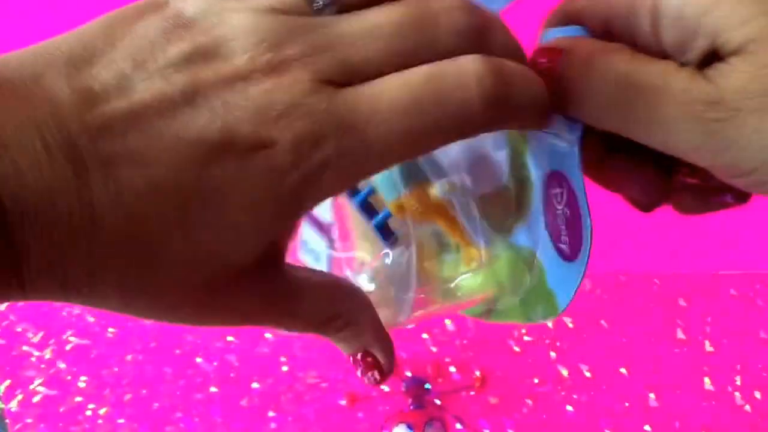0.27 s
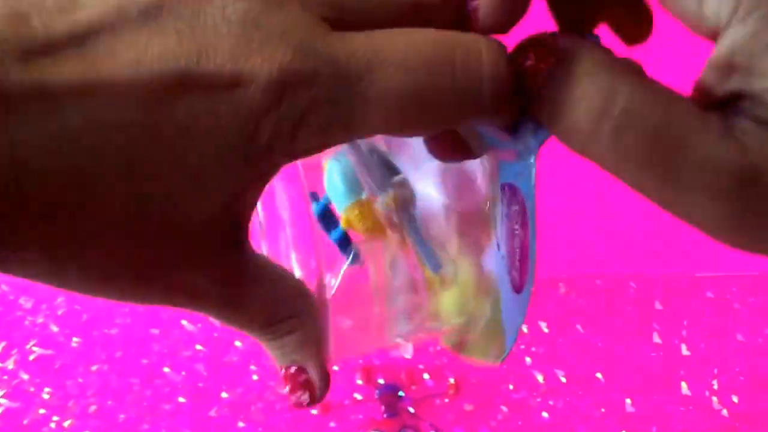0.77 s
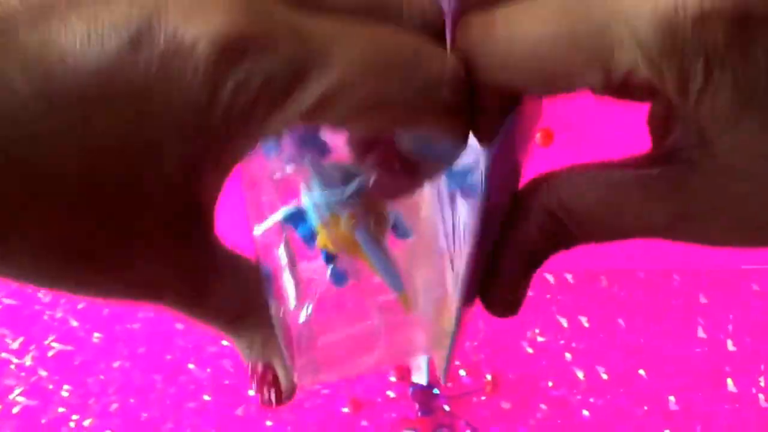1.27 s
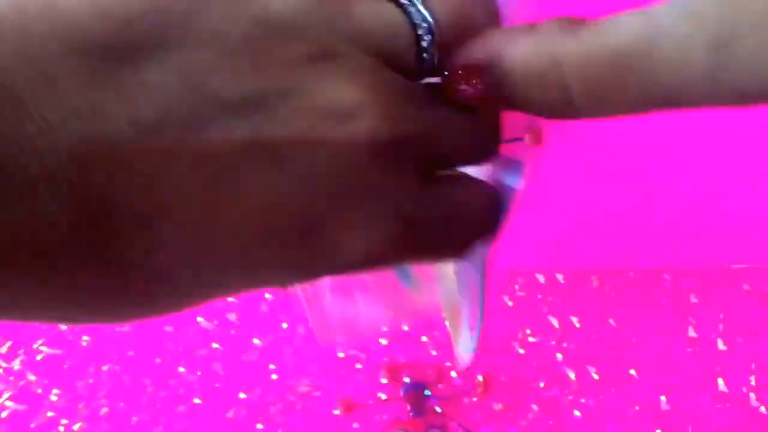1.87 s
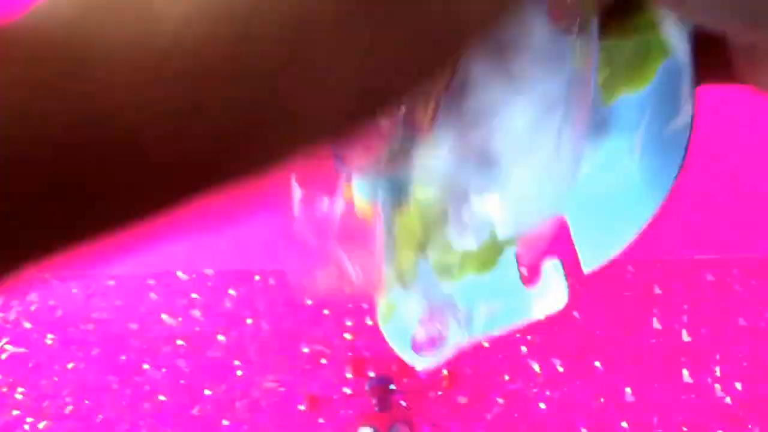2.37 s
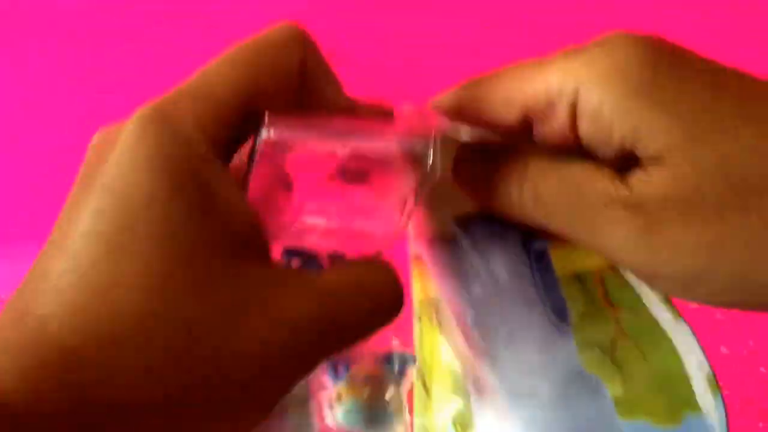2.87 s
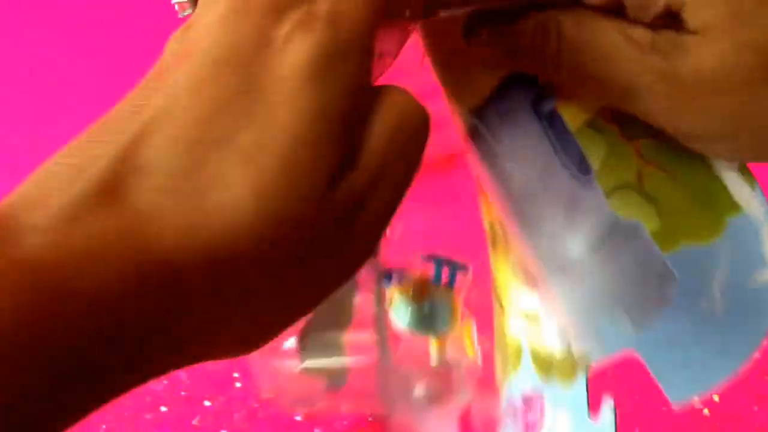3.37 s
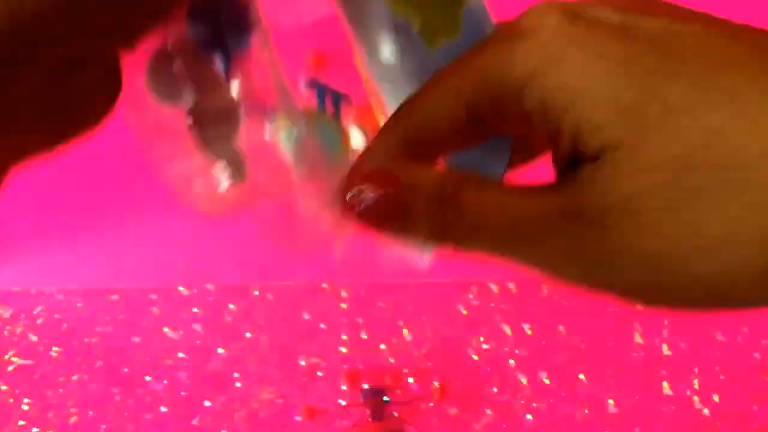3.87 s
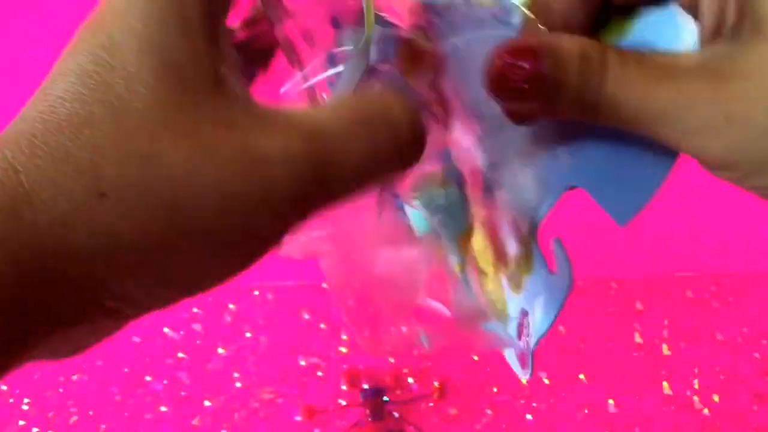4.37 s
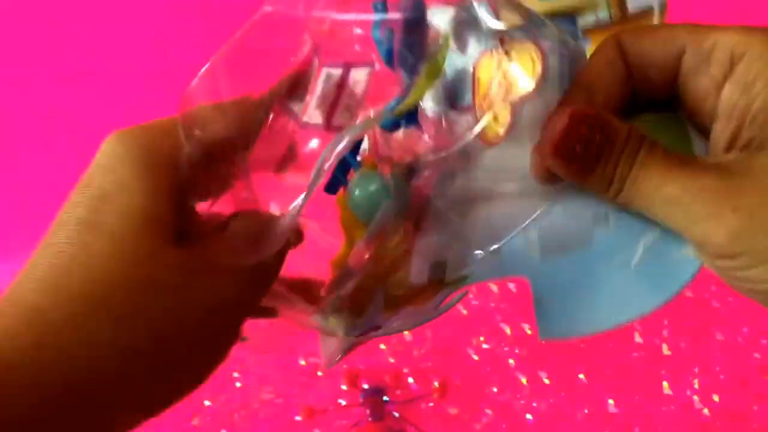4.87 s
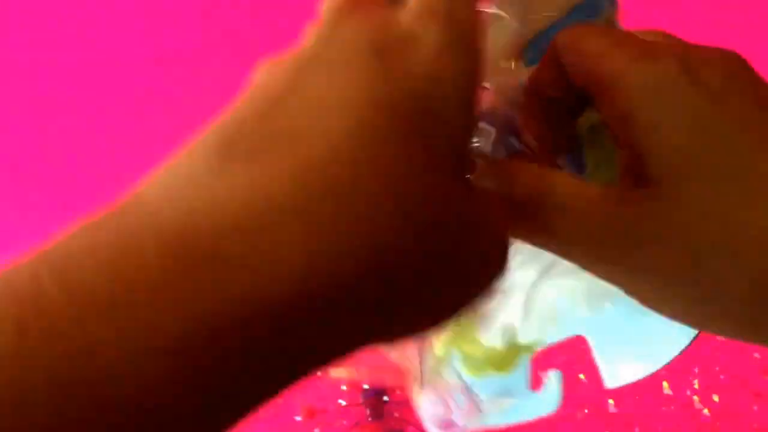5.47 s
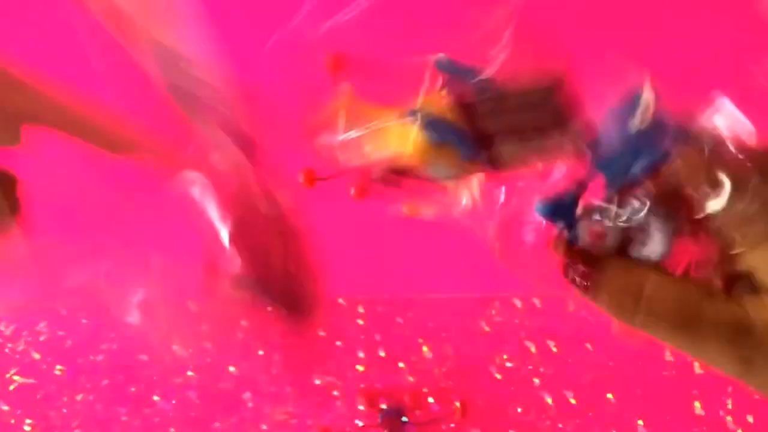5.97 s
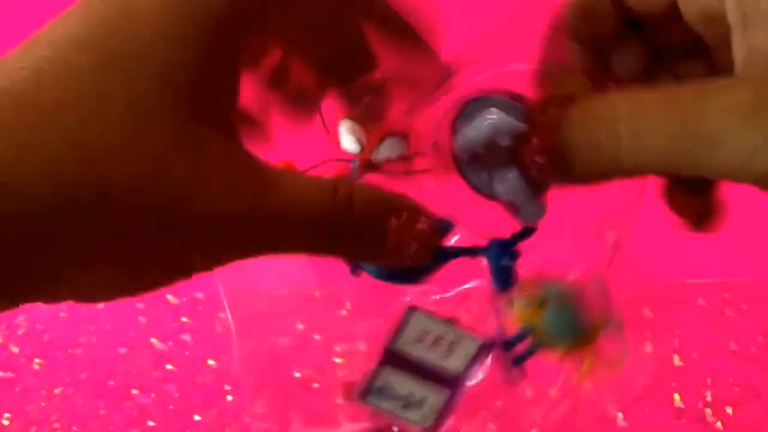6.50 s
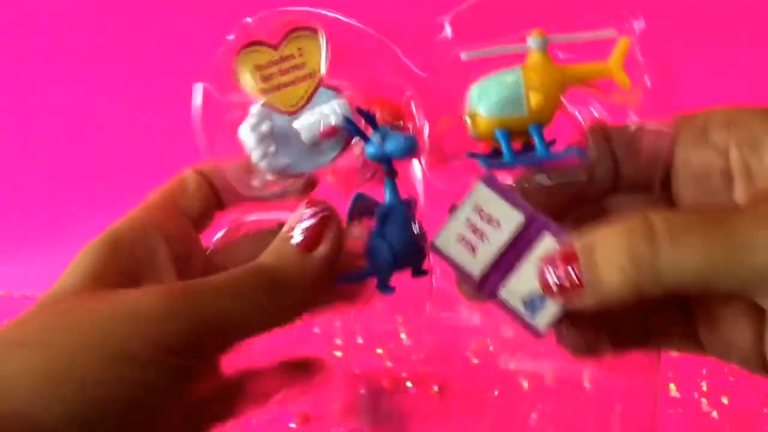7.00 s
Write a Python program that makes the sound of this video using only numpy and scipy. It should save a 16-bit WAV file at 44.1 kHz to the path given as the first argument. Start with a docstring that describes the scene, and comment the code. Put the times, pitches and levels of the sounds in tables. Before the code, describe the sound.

A stiff plastic blister pack crackles and snaps irregularly as fingers work it open, with rubbing and a few hollow knocks.

```python
"""A small room, microphone close to two hands prying and twisting a stiff clear plastic blister.
Over a low hush the fingers rub and creases slip in a fine crackle. Dents start to pop through, coloured
by the hollow shell and trailed by the room, among soft bumps and hollow knocks. At 3.6 s a finger
squeaks along the film. The snaps crowd up to the loudest near 6 s, which softly overloads the
microphone; the level dips briefly at 6.8 s, and the stand shakes under the last snaps."""
import sys
import numpy as np
from scipy import signal
from scipy.fft import rfft, irfft
from scipy.io import wavfile
from scipy.ndimage import uniform_filter1d

SR = 44100
rng = np.random.default_rng(int(sys.argv[2]) if len(sys.argv) > 2 else 0)


def waveform_to_disk(signal):
    """Save audio, clipped to [-1, 1], as 16-bit WAV at the path in sys.argv[1]."""
    frames = np.transpose(np.atleast_2d(signal))
    scaled = np.clip(frames, -1, 1) * 32767
    samples = np.round(scaled).astype(np.int16)
    wavfile.write(sys.argv[1], SR, samples)


N = 319239


def gain_of(db):
    """Decibels to gain."""
    return 10 ** (np.asarray(db) / 20)


def unit_rms(x):
    """Scales to an rms of one."""
    return x / np.sqrt(np.mean(x ** 2) + 1e-20)


def over_frequency(points, hz):
    """Joins points with straight lines on a log-frequency axis."""
    f, value = np.transpose(points)
    return np.interp(np.log(hz + 1), np.log(f + 1), value)


def over_time(rows):
    """Columns of a curve table at every sample."""
    s, *columns = np.transpose(rows)
    return [np.interp(np.arange(N) / SR, s, c) for c in columns]


def band(x, lo_hz, hi_hz):
    """Causal band-pass."""
    return signal.sosfilt(signal.butter(2, [lo_hz, hi_hz], "bandpass", fs=SR, output="sos"), x)


def mode(x, hz, width_hz):
    """Two-pole resonance of gain one at its centre."""
    return signal.lfilter(*signal.iirpeak(hz, hz / width_hz, SR), x)


def wander(samples):
    """Unit-rms noise, smoothed over so many samples."""
    return unit_rms(uniform_filter1d(rng.standard_normal(N), samples))


def clicks(per_s, spread_db):
    """Tiny slips of random size, louder and softer in clumps."""
    clumps = gain_of(5.1 * wander(500))
    size = gain_of(spread_db * np.minimum(rng.exponential(1, N), 4)) * rng.choice([-1, 1], N)
    return size * clumps * (rng.random(N) < per_s / SR)


# Room tone at the microphone: f/Hz, relative spectral level/dB
ROOM_TONE = [(18, -77), (30, -54), (55, -10), (124, -3.5), (215, -1.5), (374, -15), (473, -32), (684, -48),
             (866, -50), (1430, -36), (1670, -35), (3140, -45), (16000, -81)]

def hush():
    """The steady low noise of the room."""
    spectrum = gain_of(over_frequency(ROOM_TONE, np.fft.rfftfreq(N, 1 / SR)))
    return gain_of(-56) * unit_rms(irfft(rfft(rng.standard_normal(N)) * spectrum, N))


# Handling noise, close up: t/s, finger rumble level/dB, stand shake level/dB
HANDLING_NOISE = [(0.0, -55, -92), (1.5, -50.5, -76), (2.78, -51, -80), (3.21, -56.5, -82), (3.9, -48, -78),
                  (4.09, -57, -66), (4.44, -49.5, -75), (5.64, -51, -79), (6.01, -49.5, -71),
                  (6.7, -55, -84), (6.84, -63, -45), (7.0, -53, -54), (7.24, -62.5, -48)]

def handling():
    """Rubbing fingers make a lumpy rumble; the stand shakes deeper down."""
    rumble_db, shake_db = over_time(HANDLING_NOISE)
    rumble = band(clicks(per_s=980, spread_db=1.5), 115, 550)
    shake = band(clicks(per_s=150, spread_db=-3.5), 39, 113)
    return gain_of(rumble_db) * unit_rms(rumble) + gain_of(shake_db) * unit_rms(shake)


def swells(events, rise_s, fade_s):
    """Summed power of events (t/s, hold/s, level/dB) that build up, hold and fade."""
    t = np.arange(0, N + 64, 64) / SR
    power = np.zeros(len(t))
    for s, hold_s, db in events:
        before, after = np.minimum(t - s, 0), np.maximum(t - s - hold_s, 0)
        power += gain_of(2 * db) * np.exp(2 * before / rise_s - 2 * after / fade_s)
    return np.interp(np.arange(N) / SR, t, power)


# A hand shifts its grip: t/s, length/s, level/dB
GRIP_SHIFTS = [(0.0, 0.034, -43.5), (0.376, 0.13, -46.5), (0.525, 0.043, -50), (0.618, 0.038, -52.5),
               (0.781, .14, -50.5), (1.029, 0.27, -52), (2.037, 0.037, -48.5), (2.255, 0.09, -42.5),
               (2.467, 0.13, -45.5), (2.67, 0.075, -44.5), (2.973, .16, -44), (3.182, 0.025, -38.5),
               (3.261, 0.13, -42.5), (3.54, .055, -39.5), (3.616, 0.063, -42.5), (3.782, .11, -45.5),
               (3.91, 0.097, -47.5), (4.07, 0.24, -52.5), (4.214, 0.11, -46.5), (4.321, 0.17, -45.5),
               (5.257, 0.066, -39), (5.505, 0.057, -34.5), (5.925, 0.084, -25.5), (6.109, 0.069, -44.5),
               (6.315, 0.11, -46), (6.517, 0.19, -47), (6.806, 0.11, -44.5), (6.96, .15, -41.5)]

def rustle_power():
    """Power with which the shifting grips rustle the film."""
    return swells(GRIP_SHIFTS, rise_s=0.0022, fade_s=0.012)


def scrapes(per_s, ms):
    """Envelope of random slips that each last a moment."""
    slips = abs(clicks(per_s, spread_db=4.0))
    return unit_rms(signal.oaconvolve(slips, signal.windows.hann(int(ms * SR / 1000)), "same"))


def crease(hz, width_hz, swish):
    """One size of crease: short slips over the shared swish of rubbing film, in one resonance."""
    envelope = scrapes(per_s=70, ms=6.4) + 0.63 * swish + 0.06
    return unit_rms(mode(envelope * rng.standard_normal(N), hz, width_hz))


# How hard the hands twist the shell: t/s, steady crackle level/dB, treble re crackle/dB
TWIST = [(0.0, -73.5, -5), (0.45, -58.5, -5), (1.0, -70, -9), (1.3, -45, -8), (1.85, -48.5, -3),
         (2.0, -57, -5), (2.45, -61, -7), (2.9, -47, -14), (3.2, -53.5, 3.5), (3.5, -59, -6.5),
         (4.05, -57.5, -3), (4.5, -51.5, -3), (4.9, -42.5, -0.5), (5.4, -51.5, 0.5), (5.8, -39.5, 3),
         (6.05, -40.5, -6), (6.25, -67, -3), (7.24, -52, -9)]

def crackle():
    """Creases slip under the twist, the snaps and the shifting grips, while skin rubs on the film."""
    twist_db, treble_db = over_time(TWIST)
    swish, rustle = scrapes(per_s=54, ms=16.7), rustle_power()
    grains = sum(crease(hz, hz / 2.47, swish) for hz in np.geomspace(700, 6000, num=7))
    fizz = crease(8400, 2500, swish) + crease(11000, 3000, swish) + crease(13200, 4000, swish)
    grip_rub = gain_of(-13.5) * np.sqrt(rustle) * unit_rms(band(rng.standard_normal(N), 1500, 9000))
    twist_rub = gain_of(twist_db - 6.5) * unit_rms(band(rng.standard_normal(N), 1500, 5000))
    level = np.sqrt(gain_of(2 * twist_db) + stir_power() + rustle)
    return grip_rub + twist_rub + level * (unit_rms(grains) + gain_of(treble_db) * unit_rms(fizz))


# Resonances of the hollow shell: f/Hz, width/Hz, relative level/dB
SHELL_MODES = [(192, 100, 2), (420, 97, 3), (555, 100, 0.5), (710, 130, 5.5), (1094, 170, 2.5),
               (1405, 137, 8), (1970, 530, -1), (2348, 180, 1), (3130, 380, -2), (4120, 2700, -17.5),
               (5330, 1800, -19.5)]

def shell(x):
    """The hollow blister rings along with the snaps and crackle on it."""
    return 0.48 * x + 0.83 * sum(gain_of(db) * mode(x, hz, width) for hz, width, db in SHELL_MODES)


# Reverberation of the small room: f/Hz, T60/s
ROOM_DECAY = [(200, 0.27), (700, 0.19), (2000, 0.16), (5000, 0.15), (12000, 0.11)]

def room(x):
    """A short tail of sparse reflections, each band dying at its own speed."""
    taps = np.zeros(SR // 2)
    at = np.arange(200, len(taps) - 20, 20)
    taps[at + rng.integers(0, 20, len(at))] = rng.choice([-1., 1.], len(at))
    hz, t, spectra = signal.stft(taps, SR, nperseg=256)
    decay = gain_of(-60 * t / over_frequency(ROOM_DECAY, hz)[:, None])
    tail = signal.istft(spectra * decay, SR, nperseg=256)[1]
    return signal.fftconvolve(x, tail / np.linalg.norm(tail))[:N]


def burst(noise, t, decay_s, rise_s):
    """Noise that creaks faintly, swells until time zero and dies; its peak is one."""
    loading = np.exp(t / rise_s) + gain_of(-20) * np.exp(t / (4.6 * decay_s))
    x = noise * np.where(t < 0, loading, np.exp(-t / decay_s))
    return x / abs(x).max()


def snap(t, hz, thump_db, crack_db, decay_s):
    """A dent flips: it rings at its own pitch, cracks in the treble and shakes the whole shell."""
    noise = rng.standard_normal((3, len(t)))
    rise_s = 0.00013 + 0.083 * decay_s  # large dents give way a little more slowly
    kick = burst(noise[0], t, decay_s, rise_s)
    ring, tear = mode(kick, hz, 90 + hz / 6), band(kick, 1140, 6160)
    tear_gain = 0.75 * (hz / 3000) ** 0.073  # wide, low dents tear less
    dent = ring / abs(ring).max() + tear_gain * tear / abs(tear).max()
    crack = burst(band(noise[1], 5600, 15260), t, 1.08 * decay_s, rise_s)
    thump = band(burst(noise[2], t, 2.67 * decay_s, rise_s), 260, 890)
    thump /= abs(thump).max()
    return dent / abs(dent).max() + gain_of(crack_db) * crack + gain_of(thump_db) * thump


# Dents popping close to the microphone: t/s, level/dB, f/Hz, treble crack re level/dB, decay/ms
DENTS = [(.238, -5, 4860, 3, 0.71), (0.3784, -15, 3550, -3, 1.9), (0.391, -16.5, 3720, -2, 5.1),
         (0.4196, -20.5, 4500, -0.5, 3.5), (.532, -24, 3450, -2, 3.3), (0.553, -34, 6800, 13, 1.5),
         (0.5677, -25.5, 2400, -22, 3), (.663, -41, 6460, 8.5, 1.3), (.743, -39.5, 4500, -7, 1.5),
         (.805, -32, 4470, 6.5, 4.1), (.826, -30, 3060, 5, 1.7), (.845, -39, 6000, 5, 1.1),
         (.899, -33.5, 520, -4, 4.8), (1.147, -43, 6000, 2, 1.5), (1.211, -15.5, 3260, 4.5, 1.26),
         (1.249, -27, 5500, 0, 2.2), (1.3684, -22.5, 7540, 3, 1.4), (1.4239, -1.5, 3600, -1, 0.51),
         (1.4852, -2, 1350, -5, 1.56), (1.5852, -5.5, 3170, 0, 0.26), (1.5973, -18.5, 3100, -5, 1.7),
         (1.6267, -9.5, 7450, 4.5, 0.46), (1.6464, -17.5, 3120, 2, 0.67), (1.6962, -14.5, 4390, -6, 0.49),
         (1.7117, -18, 4400, 2, 1), (1.733, -5.5, 2800, -1, 0.58), (1.7551, -19, 1850, 0.5, 3.1),
         (1.7943, -18, 2090, -8, 0.55), (1.8396, -23, 1420, 1, 0.45), (1.8974, -23.5, 513, -20, 4.4),
         (1.9216, -18.5, 1380, -15, 0.63), (2.0608, -29.5, 3470, 10, 2), (2.146, -11, 3280, -25, 0.86),
         (2.195, -20.5, 3490, -4, 4.2), (2.2755, -12.5, 3420, 0, 0.84), (2.376, -16.5, 4500, -5.5, 3.2),
         (2.5752, -21.5, 2560, -4, 0.87), (2.611, -29, 4470, -2, 1.5), (2.669, -23.5, 3050, 4.5, 2.7),
         (2.6787, -17, 3480, -16, .6), (2.7344, -28, 1390, 2, 2.6), (2.7778, -5.5, 6000, -7, 1.15),
         (2.828, -22.5, 3140, -35, 0.63), (2.872, -28, 1430, -5, 2.4), (2.9836, -15, 3970, -24, 1.1),
         (2.99, -16.5, 2750, -6, 1.9), (3.0101, -4, 1230, -28, 0.74), (3.0188, -12, 1420, -29, 1.7),
         (3.105, -26.5, 3580, -2, 8.4), (3.204, -24.5, 3500, -1, 2.9), (3.252, -24, 3600, -5, 0.39),
         (3.275, -27, 2630, -10, 3.6), (3.3324, -24, 556, -16, 1.5), (3.3435, -7.5, 1720, -1, 1),
         (3.416, -23.5, 2800, 0.5, 1.3), (3.4342, -17, 2490, -4, 0.69), (3.4574, -20, 2170, -6, 1.5),
         (3.507, -24.5, 2530, 1, 0.55), (3.5525, -21, 3090, -19, 0.92), (3.5618, -10.5, 3540, -8, 2.3),
         (3.599, -20, 1700, 3, 0.92), (3.621, -19, 7400, 0, 4.2), (3.6978, -20.5, 770, -27, 3),
         (3.777, -30, 5500, 5, 0.69), (3.9312, -22, 5300, -3, 5.9), (3.9934, -25, 503, 3, 2.8),
         (4.1465, -23, 4370, -2, 3.2), (4.235, -21, 3030, 1, 0.32), (4.321, -23.5, 2970, -20, 1.2),
         (4.3417, -25, 2210, 2.5, 6.6), (4.375, -35, 6590, 11, 1), (4.3973, -15, 860, -6, 1.4),
         (4.4144, -7, 2240, -36, 1.15), (4.4379, -14, 1980, -24, 2), (4.5084, -4, 4340, -8, 2.8),
         (4.6587, -24.5, 2450, -9, 1.1), (4.704, -7, 3740, -1.5, 0.9), (4.7137, -13.5, 2870, -22, 1.8),
         (4.7209, -14.5, 6560, 0, 3.4), (4.7428, -31, 484, -18, 4.9), (4.7593, -8.5, 7540, 11, 0.61),
         (4.824, -11, 2610, 1, 0.75), (4.8382, -24, 1440, 9, 1.9), (4.857, -16, 5300, 2, .51),
         (4.8925, -21, 2160, 6, 0.73), (4.9046, -11.5, 2170, 1.5, 0.44), (4.9785, -20.5, 2000, -18, 4.1),
         (5.0063, -20, 6800, -2, 3), (5.027, -5.5, 3470, 3.5, 3.2), (5.1366, -18.5, 4520, -1.5, 0.36),
         (5.1658, -9.5, 2260, -14, 1.2), (5.203, -23.5, 2420, -17, 0.75), (5.2775, -12, 4900, -5, 2.8),
         (5.2924, -9.5, 2430, -12, 0.61), (5.3532, -20, 2470, 7, 3.1), (5.479, -20, 2660, -4, 3.2),
         (5.4981, -2.5, 2700, -6, 1.6), (5.5206, -16.5, 3600, 2, 6.5), (5.5588, -3, 2180, -6, 1.4),
         (5.616, -22, 3380, -19, 1.1), (5.6249, -17, 3510, -18, 1.1), (5.6454, -5, 2660, -3, 0.96),
         (5.653, -11.5, 8200, 7, 5.1), (5.7299, -12, 2640, 8.5, 0.42), (5.7695, -.5, 2080, -26, 1.28),
         (5.7848, -9, 3720, -3, 0.78), (5.809, -23.5, 1990, -3, 0.88), (5.828, -9.5, 6100, 3, 0.59),
         (5.8383, -14.5, 6900, -4, 1.4), (5.851, -12.5, 5860, -3, 1), (5.864, -17, 4500, 1, 1.8),
         (5.889, -23, 3510, 5, 0.44), (5.924, -14, 3050, -20, 0.62), (5.942, -11.5, 3130, -2, 2.7),
         (5.9568, 9.5, 3470, -3, 1.93), (5.975, -13, 1490, 12.5, 3), (5.983, -5, 3920, 0, 4.4),
         (6.0193, -6, 5070, 4.5, 0.75), (6.0426, -8.5, 3600, -6, 2), (6.1156, -27.5, 650, -22, 11),
         (6.1332, -18, 1530, -3, 4.1), (6.157, -15.5, 4690, -19, 0.74), (6.2992, -27.5, 1580, -24, 3.2),
         (6.33, -30.5, 4060, 3, 2.3), (6.3743, -18, 1620, -27, 3.5), (6.4173, -24, 768, -29, .85),
         (6.572, -31, 4500, -6.5, 0.89), (6.61, -31.5, 2510, -3, 4.7), (6.6326, -19, 2780, -7, 1.2),
         (6.6891, -11.5, 2860, -2, 1.56), (6.81, -28, 1770, -1.5, 3.2), (6.8368, -18.5, 2130, -20, 2.8),
         (6.8638, -23, 1280, 6, 1.8), (6.9634, -26, 2460, -17, 1.6), (6.9735, -24.5, 830, -28, 1.7),
         (6.9906, -10, 3900, 0, 2.3), (7.0065, -7.5, 1710, 1.5, 1.54), (7.0232, -20, 2020, -12, 2.6),
         (7.0356, -28, 2110, -23, 2.6), (7.048, -9, 5260, 1, 1.3), (7.0758, -23.5, 1880, -0.5, 6.7),
         (7.2349, -24.5, 804, -34, 4.5)]

def snaps():
    """Dents load up and pop through one by one; wide, slow ones shake the shell more."""
    lead, length = 256, 2048  # samples: loading before the peak, whole snap
    t, out = (np.arange(length) - lead) / SR, np.zeros(N + length)
    for s, db, hz, crack_db, ms in DENTS:
        thump_db = -22 - 3.5 * np.log2(hz / 3000) + 3.5 * np.log2(ms)
        thump_db -= 0.14 * db  # the thump grows less than the snap does
        at = round(s * SR)
        out[at:at + length] += gain_of(db) * snap(t, hz, thump_db, crack_db, ms / 1000)
    return out[lead:N + lead]


def stir_power():
    """Power with which each snap stirs the creases around it; softer snaps stir less."""
    return swells([(s, 0, -36 + 0.89 * db) for s, db, *_ in DENTS], rise_s=0.004, fade_s=0.034)


# Knuckles and card bumping the shell: t/s, level/dB, f/Hz
BUMPS = [(0.392, -29, 350), (1.489, -23.5, 290), (1.752, -30, 222), (1.9, -21, 197), (2.337, -26.5, 360),
         (2.642, -35, 188), (3.018, -26, 340), (3.052, -34, 146), (3.563, -37, 287), (3.876, -24, 225),
         (4.408, -29.5, 280), (4.442, -27.5, 338), (4.51, -28.5, 335), (4.744, -25.5, 335),
         (5.299, -30.5, 305), (5.416, -30, 224), (5.505, -28, 292), (5.773, -25, 332), (6.13, -18, 322),
         (6.377, -27, 270), (7.006, -25, 358), (7.078, -31, 255)]

def bumps():
    """Each soft bump is a few low cycles that swell, fade and sag in pitch."""
    t, out = np.arange(N) / SR, np.zeros(N)
    for (s, db, hz), phase in zip(BUMPS, rng.random(len(BUMPS))):
        near = slice(round((s - .03) * SR), round((s + 0.04) * SR))
        dt = t[near] - s
        envelope = np.exp(-abs(dt) / np.where(dt < 0, .003, .007))
        cycles = hz * dt * (1 - 28.0 * dt) + phase
        out[near] += gain_of(db) * envelope * np.cos(2 * np.pi * cycles)
    return out


# Hollow knocks on the blister's panels: t/s, level/dB, f/Hz
PANEL_KNOCKS = [(0.567, -27, 700), (0.898, -23.5, 393), (1.481, -29, 1290), (2.195, -28.5, 396),
                (2.463, -24.5, 400), (2.501, -27, 368), (3.697, -14, 734), (4.226, -27, 378),
                (6.129, -12, 1517), (6.687, -20, 702), (6.836, -22.5, 1170), (6.862, -17, 1270)]

def knocks(rise_s=0.0011, t60_s=0.039):
    """A struck panel rings clearly in one dying mode."""
    t, out = np.arange(4096) / SR, np.zeros(N)
    attack = 1 - np.exp(-t / rise_s)
    for s, db, hz in PANEL_KNOCKS:
        at = round(s * SR)
        out[at:at + len(t)] += gain_of(db - 60 * t / t60_s) * attack * np.sin(2 * np.pi * hz * t)
    return out


# A finger catches on the film and slides: t/s, length/s, level/dB, slip rate f/Hz
FINGER_SLIDES = [(3.568, 0.03, -43, 2507), (3.616, .03, -36, 2613), (3.642, 0.039, -51, 2640)]
# Harmonics of the squeak: multiple of the slip rate, relative level/dB
SLIP_HARMONICS = [(1, 3), (2, -27), (3, 0), (4, 6), (5, -10)]

def squeak(edge_s=0.0028, growth_db=1, glide=0.0151):
    """Quick stick-slip at an unsteady, slightly climbing rate, mixed with the hiss of sliding."""
    level, hz, t = np.zeros(N), np.zeros(N), np.arange(N) / SR
    for s, length, db, slip_hz in FINGER_SLIDES:
        progress = np.clip((t - s) / length, 0, 1)
        gate = np.clip(np.minimum(t - s, s + length - t) / edge_s, 0, 1)
        level += gate * gain_of(db + growth_db * progress)
        hz = np.where(t > s, slip_hz * (1 + glide * progress), hz)
    cycles = np.cumsum(hz * (1 + 0.029 * wander(60))) / SR
    tone = sum(gain_of(db) * np.cos(2 * np.pi * k * cycles) for k, db in SLIP_HARMONICS)
    tone_rms = np.linalg.norm(gain_of([db for _, db in SLIP_HARMONICS])) / np.sqrt(2)
    hiss = unit_rms(band(rng.standard_normal(N), 5700, 14400))
    grip = gain_of(7.7 * wander(120))  # the finger catches unevenly
    return level * grip * (tone / tone_rms + 0.49 * hiss)


def dip(at_s=6.772, depth_db=-17, width_s=0.013):
    """The level of everything dips briefly."""
    return gain_of(depth_db * np.exp(-((np.arange(N) / SR - at_s) / width_s) ** 2))


def scene():
    """Mono: the plastic close up, with the room's tail and hush behind it."""
    plastic = shell(snaps() + crackle()) + squeak() + handling() + bumps() + knocks()
    return (dip() * (plastic + gain_of(-15) * room(plastic) + hush()))[None]


# Response of the close microphone: f/Hz, level/dB
MIC_RESPONSE = [(30, -12), (100, -3), (300, 0), (1000, -4.5), (4000, 0), (9000, 0), (15000, 0)]

def record(dry, top_hz=16000):
    """The microphone colours the sound, overloads softly on the loudest pop and loses the top treble."""
    hz = np.linspace(0, SR / 2, 513)
    microphone = signal.firwin2(1023, hz, gain_of(over_frequency(MIC_RESPONSE, hz)), fs=SR)
    coloured = signal.oaconvolve(dry, microphone[None], "same")
    overloaded = coloured / (1 + abs(coloured) ** 4) ** (1 / 4)
    low_pass = signal.firwin(511, top_hz, window=("kaiser", 9), fs=SR)
    return signal.oaconvolve(overloaded, low_pass[None], "same")


dry = scene()
out = record(dry)
waveform_to_disk(out)
```